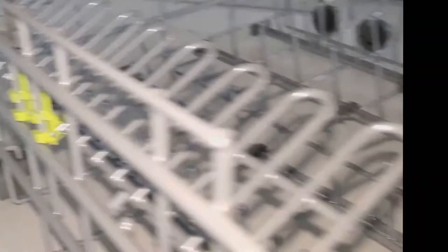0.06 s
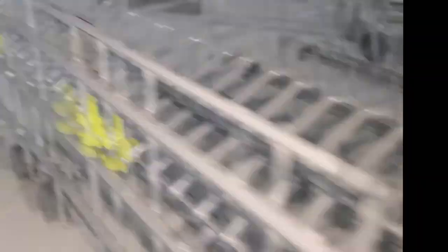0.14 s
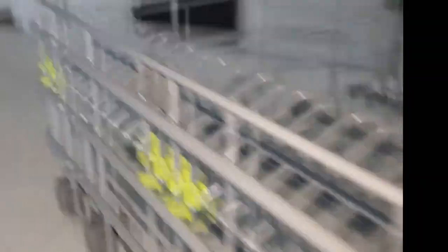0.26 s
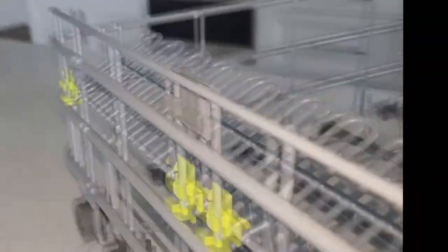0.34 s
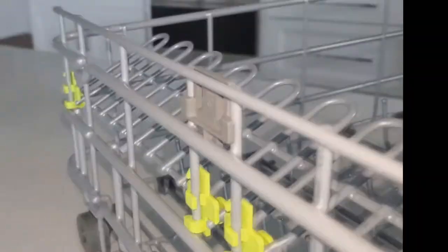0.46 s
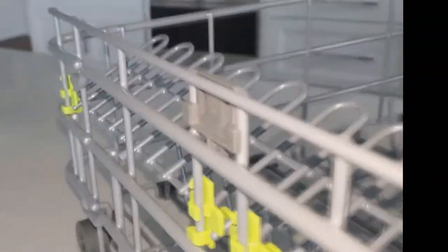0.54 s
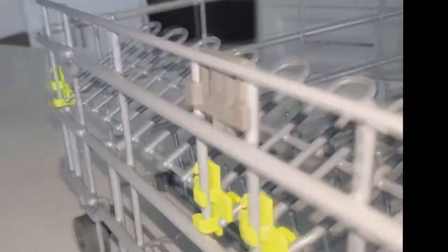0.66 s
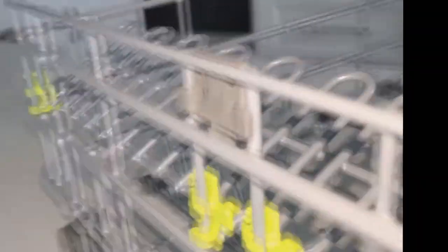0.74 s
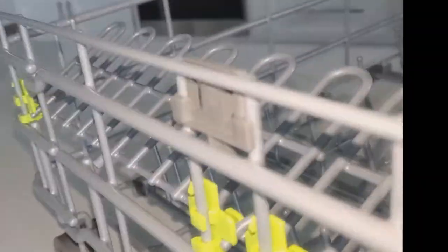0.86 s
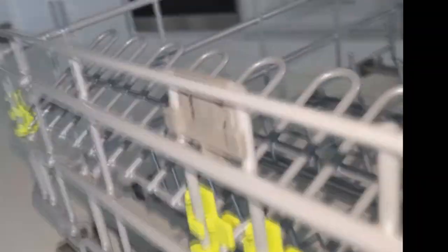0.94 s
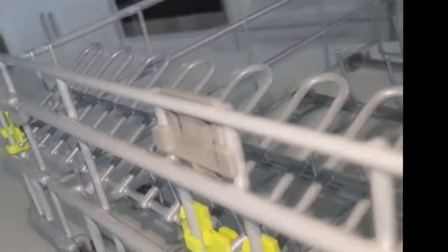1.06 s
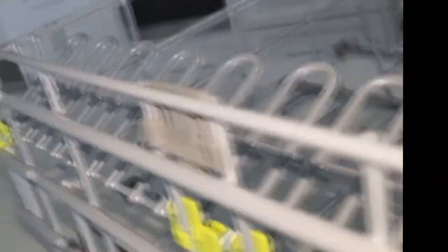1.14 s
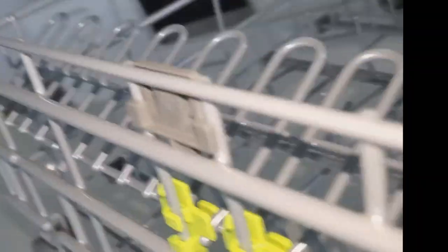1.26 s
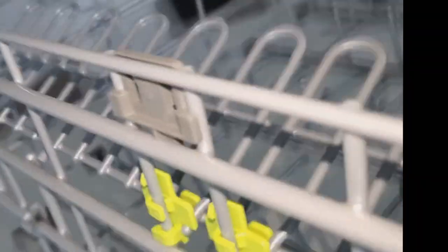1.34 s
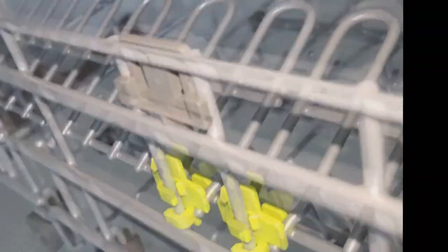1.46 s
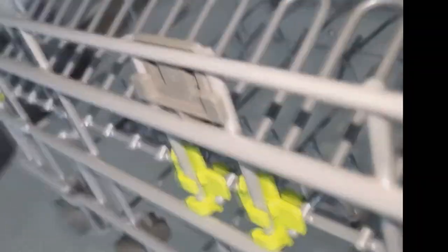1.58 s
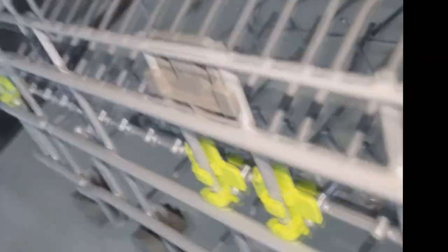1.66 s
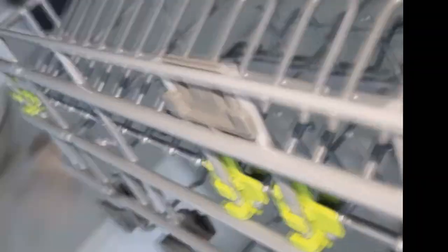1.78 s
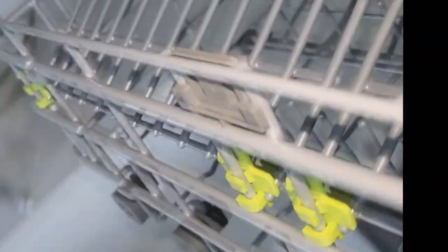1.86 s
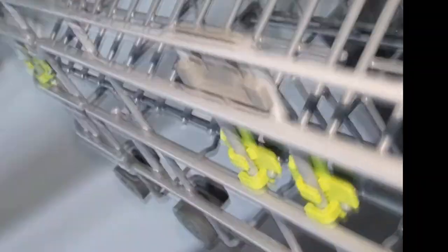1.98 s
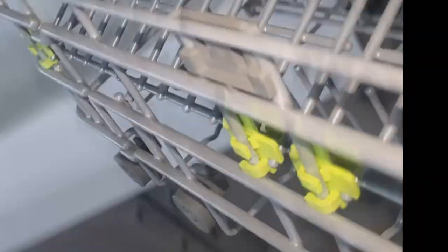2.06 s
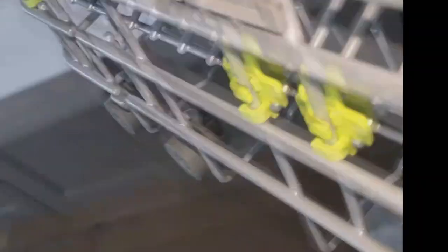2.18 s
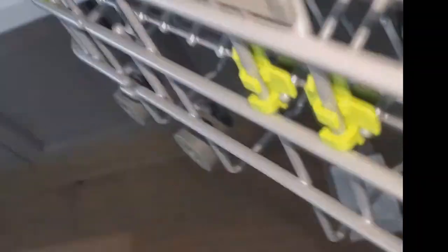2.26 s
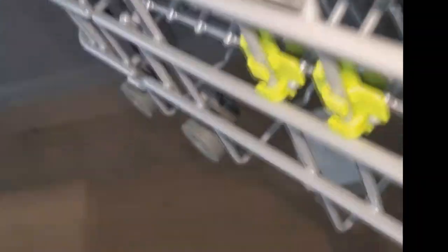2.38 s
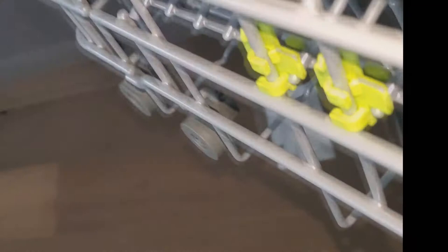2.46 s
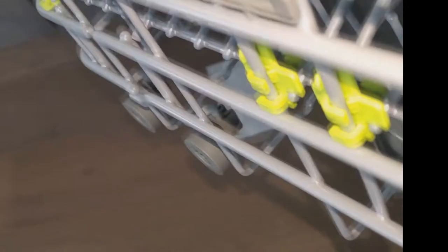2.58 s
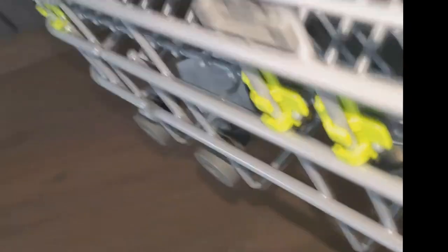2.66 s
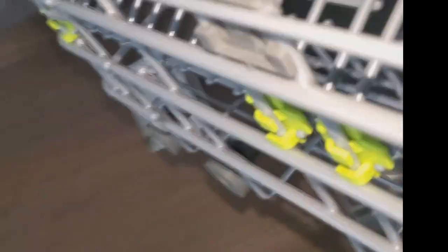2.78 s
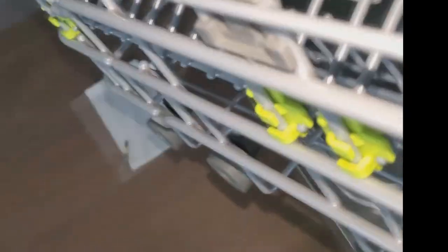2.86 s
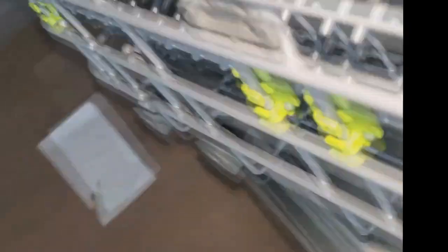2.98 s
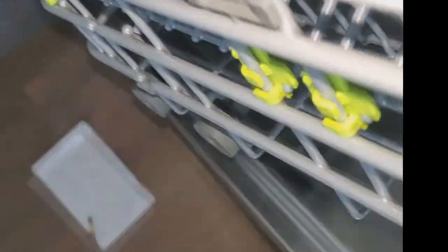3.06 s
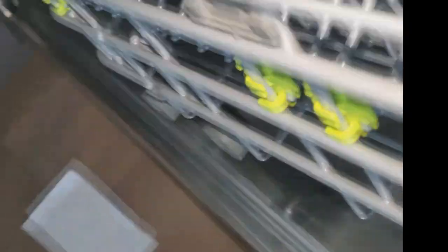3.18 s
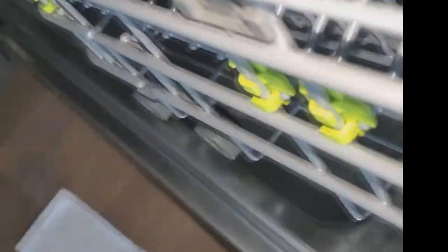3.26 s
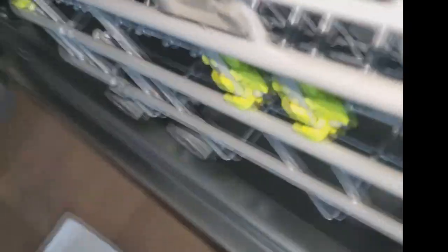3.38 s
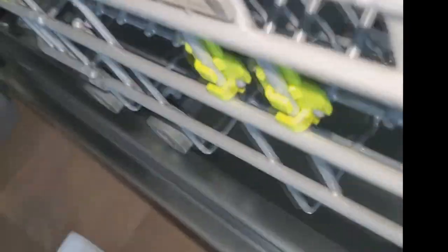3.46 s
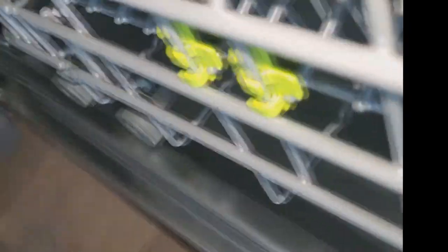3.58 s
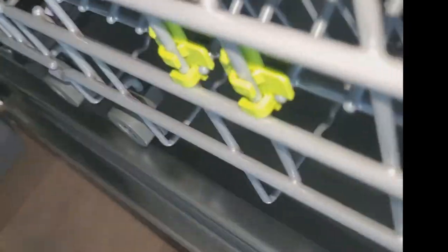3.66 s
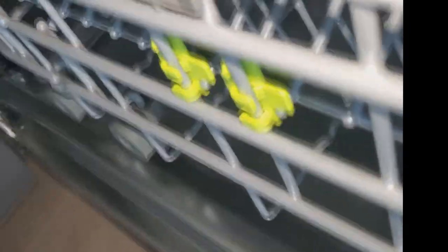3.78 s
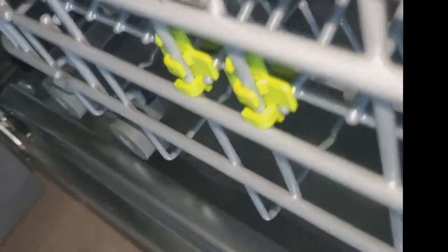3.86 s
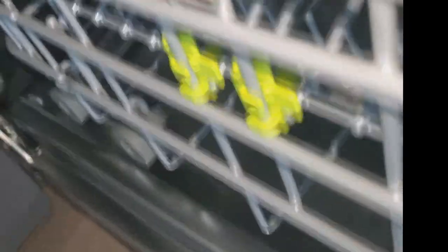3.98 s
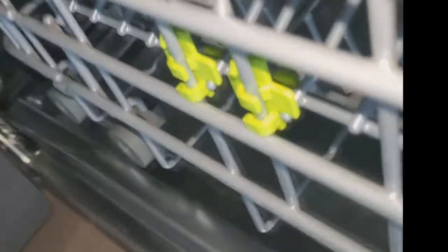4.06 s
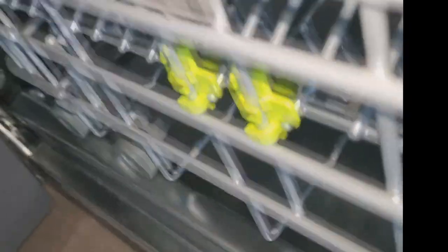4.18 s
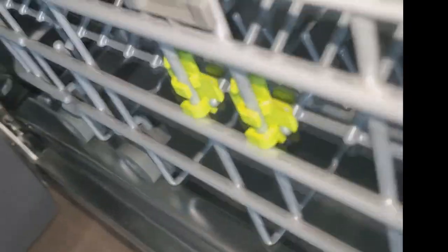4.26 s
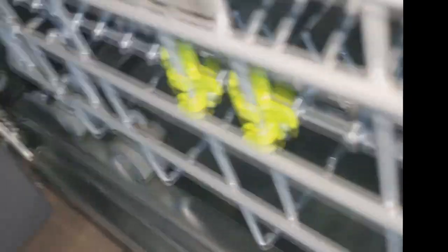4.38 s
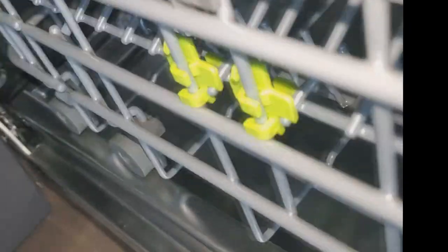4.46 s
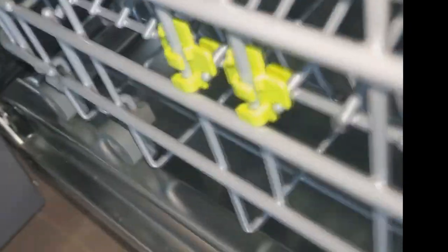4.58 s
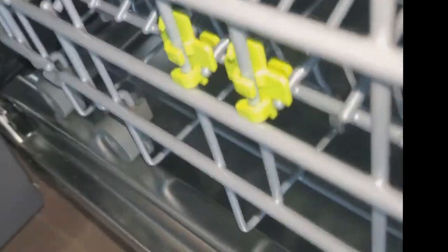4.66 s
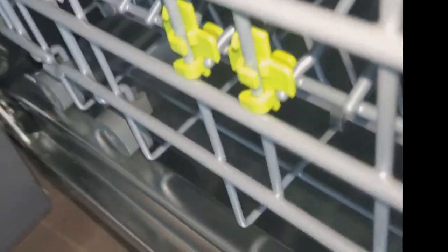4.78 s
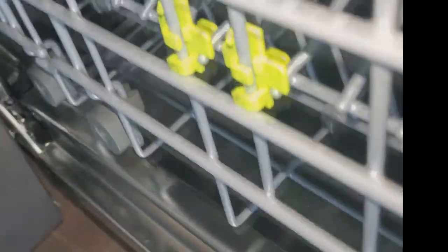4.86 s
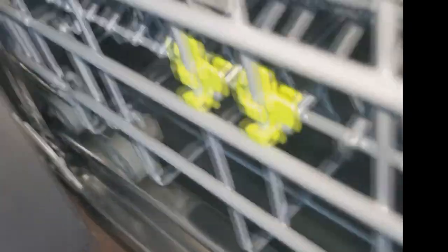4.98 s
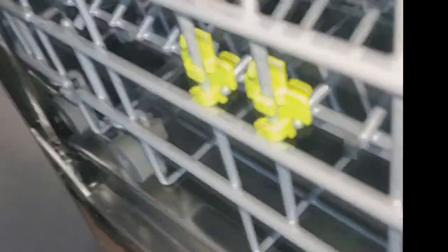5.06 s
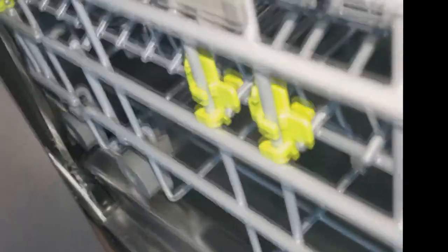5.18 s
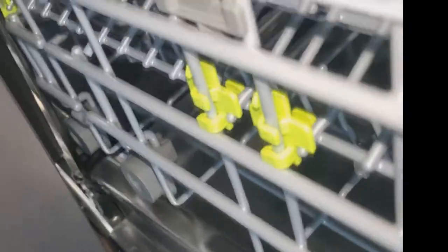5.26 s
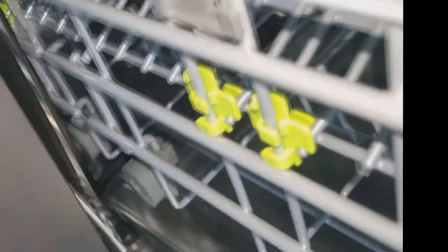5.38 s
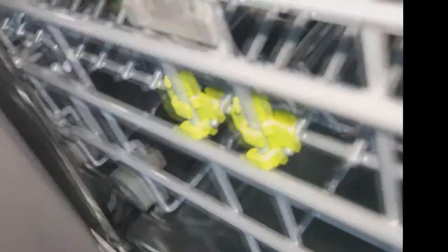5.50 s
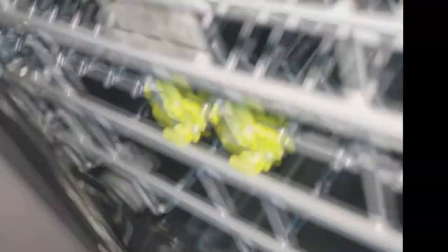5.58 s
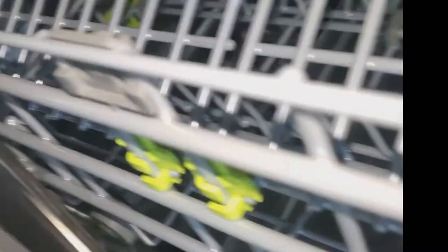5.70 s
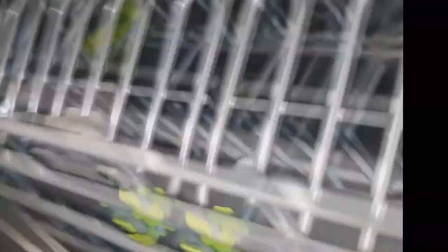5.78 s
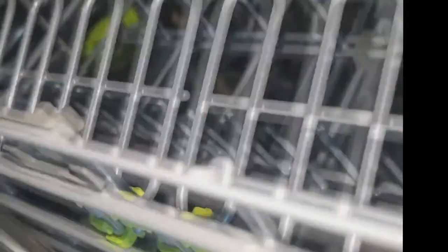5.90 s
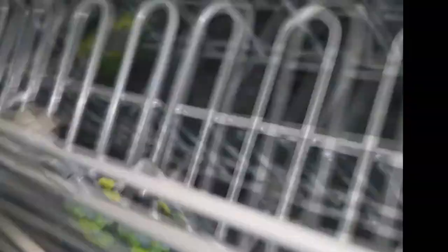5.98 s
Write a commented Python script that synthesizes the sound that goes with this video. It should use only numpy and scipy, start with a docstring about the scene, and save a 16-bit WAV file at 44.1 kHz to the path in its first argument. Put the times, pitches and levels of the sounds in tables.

```python
"""In a kitchen, a wire dishwasher rack is rolled along its rails close to a hand-held microphone.
The hand is deep noise, clicks and dull bumps on the casing; the rolling is coloured grainy noise led by speed.
Squeaks are narrow noise bands; each knock layers noise bursts with decaying pings and a low shudder.
Blows set the modes of basket and tub ringing, and decaying noise bands give the room's reflections."""
import sys
import numpy as np
from scipy import signal
from scipy.fft import rfft, irfft, next_fast_len
from scipy.io import wavfile
from scipy.ndimage import uniform_filter1d

SR = 44100
rng = np.random.default_rng(int(sys.argv[2]) if len(sys.argv) > 2 else 0)


def persist_wave(psi):
    """Save psi, clipped to +-1, as 16-bit WAV."""
    counts = np.round(np.clip(psi, -1, 1) * 32767).astype(np.int16)
    wavfile.write(sys.argv[1], SR, np.atleast_2d(counts).T)


N = 265923
TIME = np.arange(N) / SR
BLOW = SR // 4  # samples in one blow
AGE = np.arange(BLOW) / SR
LONG_AGE = np.arange(SR) / SR  # for the longer ringing and the room


def from_db(db):
    """Decibels to gain."""
    return 10 ** (np.asarray(db) / 20)


def rms_one(x):
    """Scale to rms 1."""
    return x / np.sqrt(np.mean(x ** 2) + 1e-20)


def blow_one(x):
    """Scale a blow to the energy of 20 ms at rms 1."""
    return rms_one(x) * np.sqrt(0.02 * SR / x.shape[-1])


def in_time(rows):
    """Interpolate each column of an automation curve, sample by sample."""
    times, *columns = np.transpose(rows)
    return [np.interp(TIME, times, column) for column in columns]


def at_hz(points, hz):
    """Read a table on a log-frequency axis."""
    table_hz, value = np.transpose(points)
    return np.interp(np.log(hz + 1e-3), np.log(table_hz), value)


def add(out, start_s, x):
    """Mix x into out from start_s."""
    i = max(round(start_s * SR), 0)
    out[:, i:i + x.shape[-1]] += x[..., :N - i]


def panned(x, pan_db):
    """Set the left-over-right level while keeping the total power."""
    gains = from_db(np.array([[0.5], [-0.5]]) * pan_db)
    return x * gains / np.sqrt(np.mean(gains ** 2, axis=0))


def dying(age, t60):
    """Free exponential decay, 60 dB down after t60 seconds."""
    return np.exp(-np.log(1000) * age / max(t60, 0.002))


def swelling(age, rise_s):
    """Attack that builds up exponentially over rise_s."""
    return 1 - np.exp(-age / max(rise_s, 1e-5))


def swell(peak_s, rise_s, fall_s):
    """Bell-shaped envelope that peaks at peak_s."""
    return np.exp(-((TIME - peak_s) / np.where(TIME < peak_s, rise_s, fall_s)) ** 2)


def band(x, hz, spread, order=2):
    """Band-pass reaching a factor 1 + spread to either side of hz."""
    edges = [hz / (1 + spread), min(hz * (1 + spread), SR * 0.45)]
    sos = signal.butter(order, edges, "band", fs=SR, output="sos")
    return signal.sosfilt(sos, x + 1e-18)


def filtered(x, spectrum):
    """Minimum-phase filter with the given spectral shape, built by folding its cepstrum."""
    size = 2 * next_fast_len(x.shape[-1] * 5 // 8)
    hz = np.arange(size // 2 + 1) * SR / size
    cepstrum = irfft(np.log(from_db(at_hz(spectrum, hz))))
    cepstrum[1:size // 2] *= 2
    cepstrum[size // 2 + 1:] = 0
    response = np.exp(rfft(cepstrum))
    return irfft(rfft(x, size) * response)[..., :x.shape[-1]]


# stereo width: (frequency [Hz], side against mid [dB])
STEREO_WIDTH = [(40, -11.5), (200, -14), (500, -8), (1200, 1), (16000, -1.5)]


def coloured(pair, spectrum):
    """Mid and side from two unrelated signals make a coloured left and right, more alike in the bass."""
    side = filtered(pair[1], STEREO_WIDTH)
    return filtered(pair[0] + side * [[1], [-1]], spectrum)


def chatter(t60, grain_db, rise_s):
    """A dying shower of uneven micro-contacts, as two unrelated noises."""
    unevenness = np.clip(rng.standard_normal(BLOW), -2, 2)
    contacts = rng.standard_normal((2, BLOW)) * from_db(grain_db * unevenness)
    return contacts * dying(AGE, t60) * swelling(AGE, rise_s)


def ringing(modes, age, lag_s=0.00023):
    """Decaying sines, each with its own lag between the microphones; a mode's level sets its energy."""
    total = 0
    for hz, db, t60 in modes:
        lags = lag_s * rng.standard_normal((2, 1))
        wave = np.sin(2 * np.pi * (hz * (age + lags) + rng.random()))
        total = total + from_db(db) * np.sqrt(0.1 / t60) * dying(age, t60) * wave
    return total


def arriving(pair, lag_s, diffuse):
    """One direct sound reaches the microphones a moment apart, with a scattered part of opposite sign."""
    left, right = pair[0] + diffuse * pair[1], pair[0] - diffuse * pair[1]
    late_left = np.interp(AGE - max(lag_s, 0), AGE, left, left=0)
    late_right = np.interp(AGE + min(lag_s, 0), AGE, right, left=0)
    return np.array([late_left, late_right])


def steady(spectrum, grain_db):
    """Dense uneven grains with the given colour; rms 1."""
    grains = rng.standard_normal((2, N)) * from_db(grain_db * rng.standard_normal(N))
    return rms_one(coloured(grains, spectrum))


def low_rumble(spectrum):
    """Deep structure-borne noise, levelled over a twelfth of a second."""
    rumble = steady(spectrum, 0)
    power = uniform_filter1d(np.mean(rumble ** 2, axis=0), size=SR // 12)
    return rumble / np.sqrt(power)


# decay of the room: (frequency [Hz], t60 [s])
ROOM_DECAY = [(60, 0.22), (300, 0.54), (1200, 0.72), (4000, 0.7), (8000, 0.86), (16000, 0.67)]


def kitchen(x, build_s=0.0014):
    """Diffuse reflections of a hard room: noise bands that each die at their own rate."""
    edges = np.geomspace(60, 17000, 11)
    tail = 0
    for low, high in zip(edges, edges[1:]):
        hz = np.sqrt(low * high)
        noise = band(rng.standard_normal((2, SR)), hz, high / hz - 1)
        tail = tail + noise * dying(LONG_AGE, at_hz(ROOM_DECAY, hz))
    tail = rms_one(tail * swelling(LONG_AGE, build_s)) / np.sqrt(SR)
    return signal.fftconvolve(x, tail, axes=1)[:, :N]


# colours of wheel rumble, wire rattle and plastic hiss: (frequency [Hz], relative level [dB])
WHEEL_COLOUR = [(90, -13.5), (160, 5), (300, 6), (500, -0.5), (900, -11), (1600, -36.5)]
WIRE_COLOUR = [(500, -9), (900, -0.5), (1800, 0.5), (2800, -1), (3800, -10.5), (6300, -14.5), (8000, -38)]
PLASTIC_COLOUR = [(4000, -16.5), (6500, 9), (11000, 9.5), (16000, -6.5)]


def settling(level_db=-37.5, t60=0.95, rumble_db=-3, hiss_db=-33):
    """The wires still rustle from an earlier shake: grainy noise dying away smoothly."""
    rustle = steady(WIRE_COLOUR, 3)
    rustle = rustle + from_db(rumble_db) * steady(WHEEL_COLOUR, 3)
    rustle = rustle + from_db(hiss_db) * steady(PLASTIC_COLOUR, 3)
    return from_db(level_db) * dying(TIME, t60) * rustle


# how firmly the hand holds the casing, until it lets go:
# (time [s], rumble level before trim [dB], left over right [dB])
HAND_GRIP = [(0, -38.5, -3.5), (.8, -37.5, -10.5), (2.1, -34, -15.5), (2.3, -16.5, -32), (2.34, -51, 16),
             (2.6, -60.5, 33), (3.1, -59, 10.5), (3.85, -58, 0)]
# the hand shifts and the rumble swells: (time [s], level before trim [dB])
HAND_SHIFTS = [(0.862, -28), (.99, -34), (1.26, -23), (1.371, -26.5), (1.778, -27), (1.98, -26.5),
               (2.169, -12.5), (2.28, -36)]
# colour of the hand's rumble: (frequency [Hz], relative density [dB per Hz])
HAND_COLOUR = [(20, -13), (35, -11.5), (55, 2.5), (80, 2), (120, -9.5), (200, -24), (400, -32.5),
               (900, -66.5)]


def handling(trim_db=-2, shift_s=0.024):
    """The grip rumbles through the casing and swells whenever the hand shifts."""
    grip_db, pan_db = in_time(HAND_GRIP)
    # shift_s is the rise and the fall of a swell
    shifting = sum(from_db(db) * swell(s, shift_s, shift_s) for s, db in HAND_SHIFTS)
    level = from_db(trim_db) * np.hypot(from_db(grip_db), shifting)
    return panned(level * low_rumble(HAND_COLOUR), pan_db)


def jiggle(per_s=26, t60=0.05):
    """Loose tines touch at random, each touch a brief decaying burst; an envelope of rms 1."""
    touches = (rng.random(N) < per_s / SR) * rng.uniform(0.4, 1, N)
    return rms_one(signal.fftconvolve(touches, dying(AGE, t60))[:N])


# how fast the rack rolls, as a wheel level: (time [s], level [dB])
ROLL_SPEED = [(0, -50), (.62, -57), (.85, -50.5), (1.4, -54), (2.25, -58.5), (2.6, -66.5), (3.05, -64),
              (3.5, -68), (3.85, -64), (3.92, -47.5), (4.28, -45), (4.5, -52), (4.9, -53.5), (5.03, -44),
              (5.44, -58), (5.6, -45), (5.75, -41.5), (6.03, -41)]
# plastic slides along the rail: (peak time [s], level before layer gain [dB], rise [s], fall [s])
RAIL_SLIDES = [(1.011, -62, 0.027, 0.28), (1.98, -68, .03, 0.05), (3.06, -61.5, 0.21, 0.088),
               (3.928, -57, 0.025, 0.053)]
# the cabinet under a rolling rack: (frequency [Hz], relative density [dB per Hz])
CABINET_COLOUR = [(25, -24.5), (50, -1), (80, 1.5), (120, -6), (200, -22.5), (400, -41.5), (900, -66)]
USUAL_SPEED_DB = -51.5
RATTLE_FOLLOWS, HISS_FOLLOWS, DRONE_FOLLOWS = 0.87, 0.6, 1.4  # dB per dB of speed


def rolling(rumble_db=-49.5, rattle_db=-58, hiss_db=-79, drone_db=-46):
    """Speed drives wheel rumble, wire rattle, plastic hiss and cabinet drone; slides add rattle and hiss."""
    speed_db = in_time(ROLL_SPEED)[0] - USUAL_SPEED_DB
    touching = rms_one(np.hypot(1, 0.7 * jiggle()))
    sliding = sum(from_db(db) * swell(s, rise_s, fall_s) for s, db, rise_s, fall_s in RAIL_SLIDES)
    rattle = np.hypot(from_db(rattle_db + RATTLE_FOLLOWS * speed_db), 1.13 * sliding)
    hiss = np.hypot(from_db(hiss_db + HISS_FOLLOWS * speed_db), sliding)
    out = from_db(rumble_db + speed_db) * steady(WHEEL_COLOUR, 4)
    out += rattle * touching * steady(WIRE_COLOUR, 2.4)
    out += hiss * steady(PLASTIC_COLOUR, 3)
    return out + from_db(drone_db + DRONE_FOLLOWS * speed_db) * low_rumble(CABINET_COLOUR)


# small plastic ticks: (time [s], level before trim [dB])
PLASTIC_TICKS = [(0.853, -21.5), (1.0655, -23), (1.213, -22), (1.3395, -39), (1.6174, -44), (2.0383, -41.5),
                 (2.201, -12.5)]


def ticks(hz=2200, t60=0.02, trim_db=-17, pan_db=15):
    """Light plastic ticks beside the left microphone: short band-passed noise bursts."""
    out = np.zeros((2, N))
    for s, db in PLASTIC_TICKS:
        tick = blow_one(band(chatter(t60, 0.87, 0.00038), hz, 0.28))
        add(out, s, from_db(db + trim_db) * tick)
    return panned(out, pan_db)


# fingers snapping on the casing:
# (time [s], snap before trim [dB], thump before trim [dB], t60 [s], left over right [dB])
FINGER_TAPS = [(.7, -23, -21.5, 0.0079, -8.5), (0.792, -29, -30, 0.011, 4), (0.9818, -35.5, -30, 0.01, -13),
               (2.152, -43.5, -22, 0.013, -13.5), (2.1633, -29, -26, 0.0057, 3.5),
               (2.19, -37.5, -23, 0.014, -6), (2.4147, -42.5, -40.5, 0.0027, -4.5),
               (2.54, -67, -57, 0.0081, 2.5)]
# dull bumps of the palm: (time [s], level [dB], top frequency [Hz], t60 [s])
PALM_BUMPS = [(1.957, -28.5, 606, 0.017), (2.147, -15, 386, 0.1), (2.163, -13.5, 171, 0.22),
              (2.19, -23, 385, 0.21), (2.233, -25.5, 443, 0.13), (2.272, -28, 354, 0.1)]
# colours of a finger snap, and of the tub, which also serves the thump:
# (frequency [Hz], relative level [dB])
SNAP_COLOUR = [(700, 1), (1400, -11), (2800, 1), (4000, -5), (5500, -3.5), (9000, -12.5), (15000, -13)]
TUB_COLOUR = [(90, -19.5), (170, 2.5), (260, -4.5), (450, -3.5), (800, -5), (1300, -12.5), (3000, -50)]


def taps(snap_db=-1.0, thump_db=-6.0, bump_pan_db=-14):
    """Noise bursts on the casing: sharp snaps with a short thump, and dull palm bumps at the right."""
    out = np.zeros((2, N))
    for s, snap, thump, t60, pan_db in FINGER_TAPS:
        tap = from_db(snap + snap_db) * blow_one(coloured(chatter(t60, 4, 0.0001), SNAP_COLOUR))
        tap += from_db(thump + thump_db) * blow_one(coloured(chatter(t60, 4.5, 0.0001), TUB_COLOUR))
        add(out, s, panned(tap, pan_db))
    for s, db, top_hz, t60 in PALM_BUMPS:
        soft = signal.butter(3, [85, max(top_hz, 120)], "band", fs=SR, output="sos")
        bump = blow_one(signal.sosfilt(soft, chatter(t60, 4.5, 0.0015)[0]))
        add(out, s, panned(from_db(db) * bump, bump_pan_db))
    return out


# wires left ringing by the jolt: (frequency [Hz], relative level [dB], t60 [s])
JOLTED_WIRES = [(533, -2, 1.2), (2019, -12, .6), (2665, -4, .6), (9760, 4, .5), (9820, 0, .4),
                (9900, 1, .45)]


def jolt(start_s=2.14, level_db=-40):
    """The first hard jolt to the rack leaves a few wires singing as decaying sines."""
    out = np.zeros((2, N))
    add(out, start_s, from_db(level_db) * ringing(JOLTED_WIRES, LONG_AGE))
    return out


# wheel squeaks: (time [s], length [s], lower band [Hz], upper band [Hz], level [dB])
WHEEL_SQUEAKS = [(3.867, 0.033, 2600, 2925, -40), (3.868, 0.031, 3680, 4140, -55),
                 (3.872, 0.013, 1524, 5350, -53), (3.906, 0.028, 2154, 2540, -45),
                 (5.53, 0.038, 157, 219, -45.5), (5.548, 0.021, 2260, 3280, -41.5),
                 (5.634, 0.011, 2333, 2670, -34), (5.636, 0.054, 2510, 3350, -33.5)]


def squeaks(width=0.0063, upper_db=-3, rasp_hz=3000, rasp_db=-7):
    """A dry wheel sticks and slips on its axle: a noise burst rasps and drives two narrow resonances."""
    out = np.zeros((2, N))
    for s, length_s, lower_hz, upper_hz, db in WHEEL_SQUEAKS:
        slips = rng.standard_normal((2, BLOW)) * (AGE < length_s)
        squeak = blow_one(band(slips, lower_hz, width, order=1))
        squeak = squeak + from_db(upper_db) * blow_one(band(slips, upper_hz, width, order=1))
        squeak = squeak + from_db(rasp_db) * blow_one(band(slips, rasp_hz, 0.3))
        add(out, s, from_db(db) * squeak)
    return out


# wire basket and tub: (frequency [Hz], relative level [dB], t60 [s])
BASKET_MODES = [(209, -8, .3), (244.5, 1.5, 0.14), (445, -10, 0.53), (538, -8, 0.34), (746, -1, 0.2),
                (961, -4, 0.27), (1180, -17, .18), (1472, -10, 0.12), (1810, -1, 0.16), (2170, -6, .2),
                (2600, -7.5, 0.22), (2880, -11, 0.21), (3050, -10, .2), (3460, -8.5, 0.18),
                (3861, -11, 0.15), (4070, -11.5, .2), (4310, -8.5, .22), (6530, -10.5, .3), (9900, -9, .4)]


def rack(x, ring_db=-48.5):
    """Blows set the wires and the tub ringing, by convolution with their decaying modes."""
    return from_db(ring_db) * signal.fftconvolve(x, ringing(BASKET_MODES, LONG_AGE), axes=1)[:, :N]


# rack knocks, levels before each layer's trim: (time [s], clack [dB], lower ping [Hz],
# upper ping [Hz], crack [dB], tub [dB], thud [dB])
RACK_KNOCKS = [ (2.14, -24, 1307, 2800, -25.5, -25.5, -40), (2.993, -53, 1470, 2510, -59, -55.5, -50),
               (3.088, -63, 1760, 2620, -60.5, -62.5, -74), (3.233, -59, 610, 2650, -57, -53, -48),
               (3.922, -47, 690, 2210, -68, -41.5, -31.5), (3.959, -61, 1540, 3320, -65, -56, -26),
               (4.072, -18.5, 1435, 2480, -31, -22.5, -17.5), (4.144, -42.5, 820, 2620, -64, -53, -26),
               (4.186, -28.5, 1495, 2400, -48, -33.5, -30), (4.2261, -29.5, 434, 1300, -27, -22.5, -23),
               (4.231, -30.5, 186, 250, -50, -36, -40), (4.277, -22.5, 2404, 3600, -43, -33.5, -45),
               (4.283, -25.5, 1420, 3980, -42, -29.5, -30), (4.285, -25, 3700, 4310, -42, -43, -27),
               (4.378, -32, 1640, 2150, -49, -41.5, -43), (4.44, -48, 1155, 1980, -65, -48, -50),
               (4.570, -37, 1064, 2294, -47.5, -54, -42), (4.579, -33.5, 697, 1440, -42.5, -30.5, -31),
               (4.843, -54, 1530, 2480, -57, -55, -65), (4.906, -44, 1760, 2820, -50.5, -37, -49),
               (4.9188, -14, 1770, 2900, -35, -23, -45), (4.9607, -21, 226, 260, -35, -17.5, -23),
               (5.0155, -29.5, 1050, 2220, -47.5, -33, -35), (5.122, -39, 279, 607, -61.5, -31, -30.5),
               (5.466, -53, 1680, 2180, -62.5, -50.5, -53), (5.521, -46, 181, 226, -60, -49, -61),
               (5.670, -24.5, 760, 1510, -34, -23.5, -17), (5.712, -28, 425, 660, -44, -24, -14),
               (5.7862, -29.5, 917, 1220, -30.5, -23.5, -19), (5.787, -30, 3570, 3715, -52, -45, -53),
               (5.886, -17, 1402, 2786, -30, -23.5, -33), (5.891, -20, 1210, 1450, -30.5, -22.5, -11.5),
               (5.959, -25, 1426, 3066, -52, -38, -29), (5.975, -27, 1210, 2100, -43, -29.5, -40)]
# door and cabinet shuddering, before random spread: (frequency [Hz], relative level [dB], t60 [s])
SHUDDER_MODES = [(63.4, -1.5, 0.19), (81.9, 1.5, 0.2), (97.8, -1.5, 0.22), (158.9, -10, 0.075)]
# colour of the contact's crack: (frequency [Hz], relative level [dB])
CRACK_COLOUR = [(2500, 3), (4000, -0.5), (6300, -8), (8000, -6), (12000, -13.5), (16000, -18)]
# a contact that pings higher also clacks brighter; one that pings lower rings more than it clacks
USUAL_PING_HZ, USUAL_CLACK_HZ = 1540, 1764
CLACK_FOLLOWS, PING_DB_PER_OCTAVE = 0.28, -3  # octaves per octave of ping; dB per octave


def shuddering():
    """The door and cabinet shudder in low modes, a little different at every blow."""
    total = 0
    for hz, db, t60 in SHUDDER_MODES:
        gain = from_db(db + rng.normal(0, 2.5))
        total = total + gain * dying(AGE, t60) * np.sin(2 * np.pi * hz * rng.normal(1, 0.035) * AGE)
    return total


def knocks(clack_db=-1.5, ping_db=-1, tub_db=0.0, crack_db=4.5, thud_db=-0.5, spread=0.65,
           clack_t60=0.065, tub_t60=0.098, ping_t60=0.045, crack_t60=0.069, grain_db=4,
           rise_s=0.00084, thud_rise_s=0.018, lag_s=0.000419, diffuse=0.57):
    """A wheel drops: the contact cracks, the basket clacks and pings, the tub booms, the door shudders."""
    blows, tones = np.zeros((2, 2, N))
    for s, clack, lower_hz, upper_hz, crack, tub, thud in RACK_KNOCKS:
        octaves = np.log2(np.sqrt(lower_hz * upper_hz) / USUAL_PING_HZ)
        clack_hz = USUAL_CLACK_HZ * 2 ** (CLACK_FOLLOWS * octaves)
        ping = clack + PING_DB_PER_OCTAVE * octaves

        clacking = blow_one(band(chatter(clack_t60, grain_db, rise_s), clack_hz, spread, order=3))
        blow = from_db(clack + clack_db) * clacking
        blow = arriving(blow, lag_s * rng.uniform(-1.32, 1.6), diffuse) / np.hypot(1, diffuse)
        cracking = coloured(chatter(crack_t60, grain_db, rise_s / 2), CRACK_COLOUR)
        blow += from_db(crack + crack_db) * blow_one(cracking)
        booming = coloured(chatter(tub_t60, grain_db, rise_s / 2), TUB_COLOUR)
        blow += from_db(tub + tub_db) * blow_one(booming)
        add(blows, s, blow)

        # each point of contact favours two well-damped resonances
        pings = ringing([(lower_hz, 0, ping_t60), (upper_hz, 0, ping_t60)], AGE)
        tone = from_db(ping + ping_db) * blow_one(pings * swelling(AGE, rise_s))
        shudder = blow_one(shuddering() * swelling(AGE, thud_rise_s))
        add(tones, s, tone + from_db(thud + thud_db) * shudder)
    return blows, tones


def scene(room_db=-12, tone_room_db=-17, tap_room_db=-25, tap_ring_db=-18):
    """The rack sounds into the room; the taps and ticks on the casing stay nearly dry."""
    blows, tones = knocks()
    near = taps() + ticks()
    basket = blows + squeaks() + rack(blows + from_db(tap_ring_db) * near)
    room_send = from_db(room_db) * basket + from_db(tone_room_db) * tones + from_db(tap_room_db) * near
    background = kitchen(room_send) + settling() + handling() + rolling()
    return background + near + jolt() + tones + basket


# microphone port: (frequency [Hz], level [dB])
PORT_RESPONSE = [(6300, 0), (6900, -3.5), (7400, -14.5), (8500, -10), (9700, -5), (11000, -1)]


def record(dry, cutoff_hz=16200):
    """The microphone port dips deepest near 7.4 kHz; peaks are rounded and the top is cut."""
    x = 1.3 * np.tanh(filtered(dry, PORT_RESPONSE) / 1.3)
    return signal.sosfilt(signal.ellip(10, 0.3, 80, cutoff_hz, fs=SR, output="sos"), x)


dry = scene()
out = record(dry)
persist_wave(out)
```